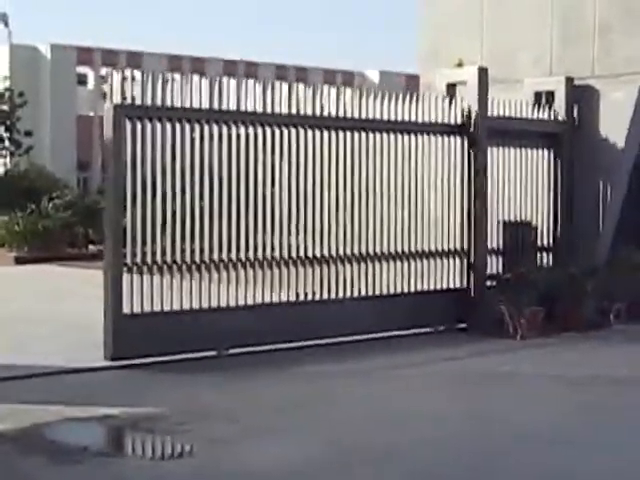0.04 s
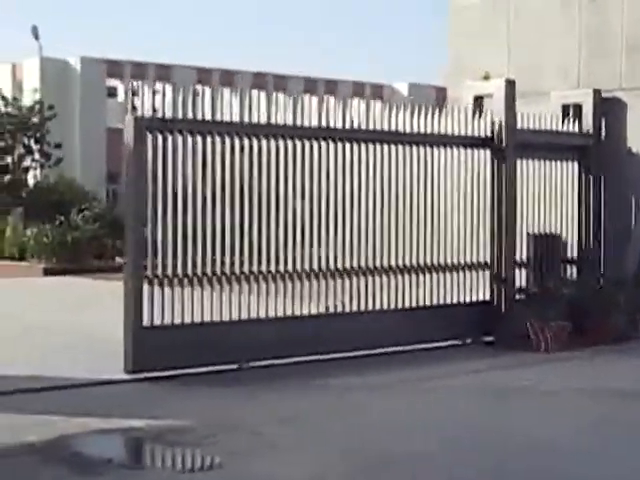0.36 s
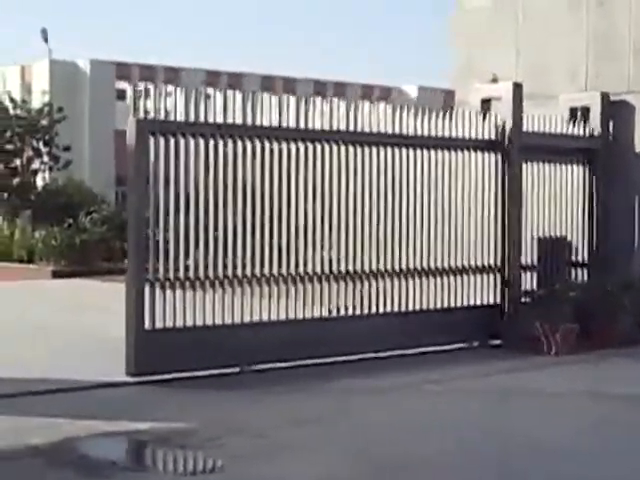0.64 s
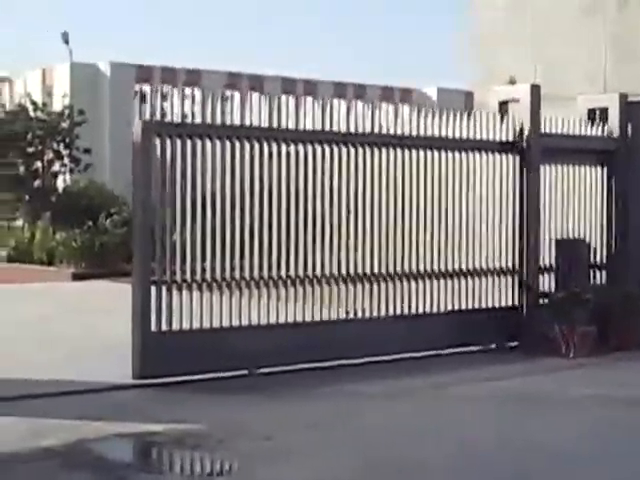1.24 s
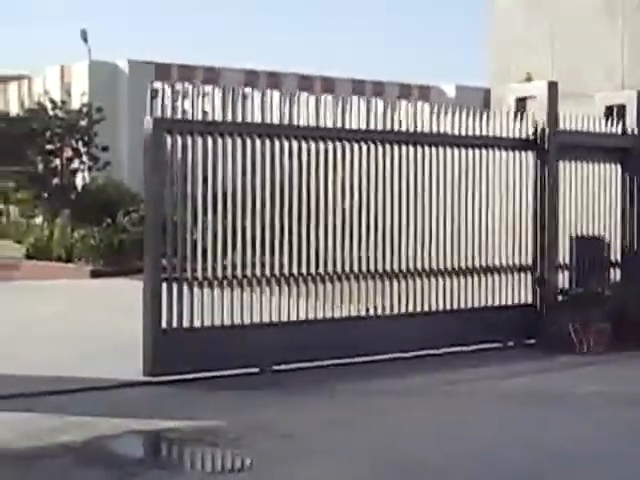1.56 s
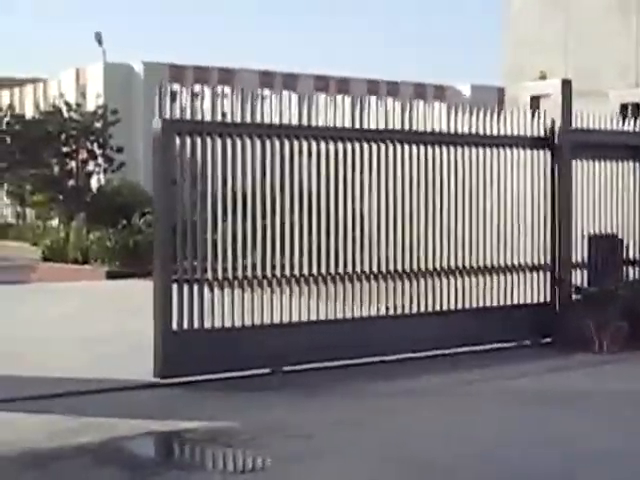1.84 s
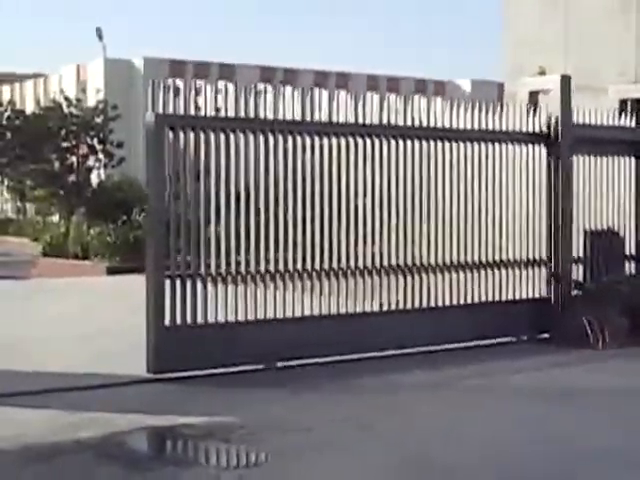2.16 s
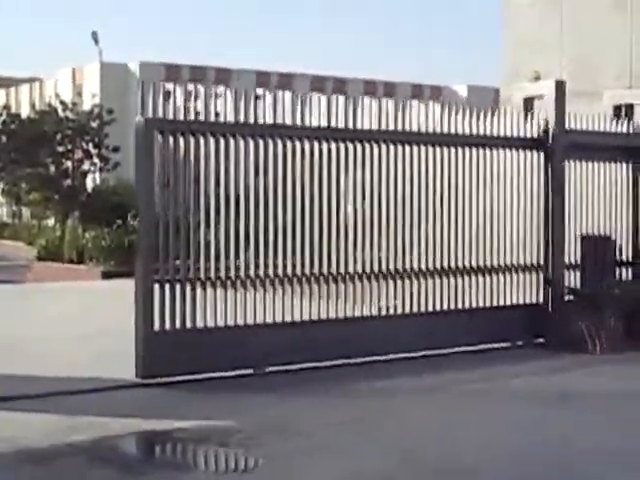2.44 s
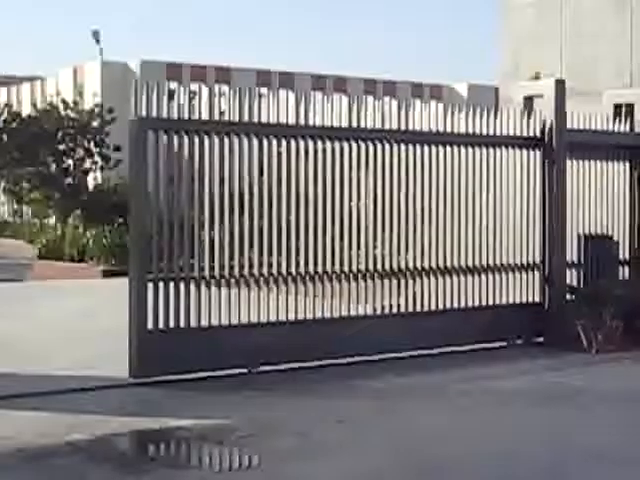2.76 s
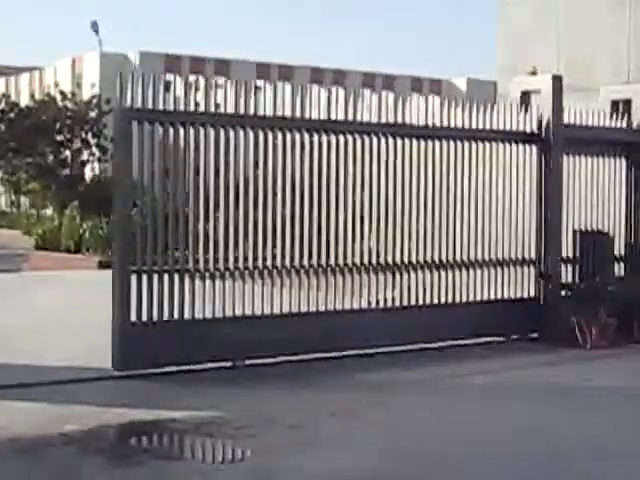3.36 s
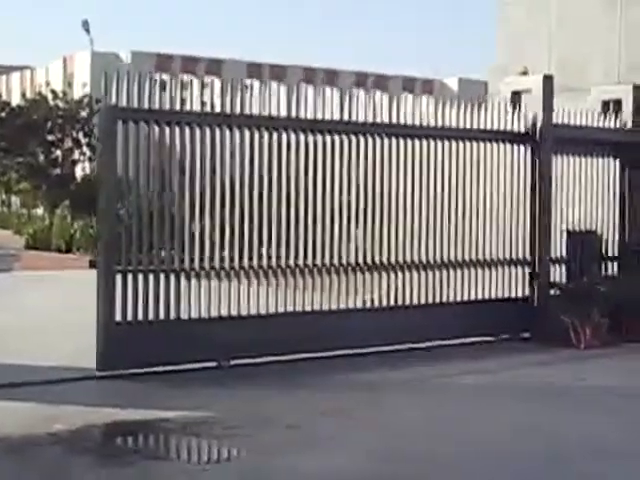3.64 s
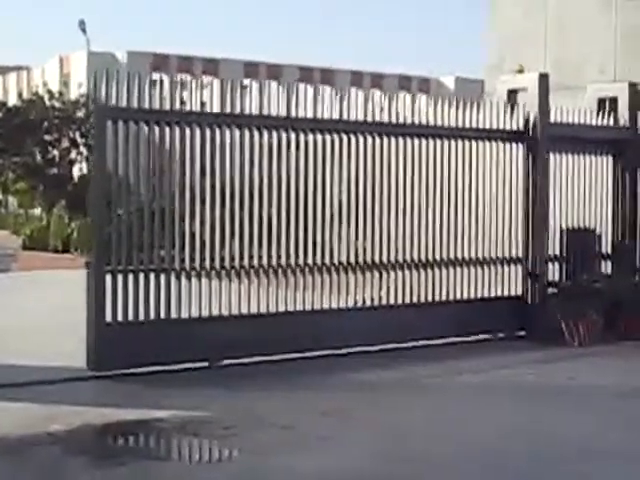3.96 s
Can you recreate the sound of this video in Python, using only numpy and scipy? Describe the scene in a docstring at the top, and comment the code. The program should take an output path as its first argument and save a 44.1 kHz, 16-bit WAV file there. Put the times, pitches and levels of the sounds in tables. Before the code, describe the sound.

A heavy steel gate rolls along its track, rumbling and rattling over a motor hum.

```python
"""A heavy steel sliding gate rolls along its track across a driveway. Its wheels rumble, scrape and hiss
on the rail, and the frame booms at uneven spots. A low drone, the motor and a few tones of the frame
waver underneath, mostly drifting upward. The drive's teeth rattle the rack about eight times a second,
louder toward the end, among sharper steel ticks. A small microphone with a dull top hears it."""
import sys
import numpy as np
from scipy import signal
from scipy.fft import rfft, irfft, next_fast_len
from scipy.io import wavfile
from scipy.ndimage import uniform_filter1d, map_coordinates

SR = 44100
rng = np.random.default_rng(int(sys.argv[2]) if len(sys.argv) > 2 else 0)


def unload_wav(signal):
    """Save mono or channel-first audio to the path in sys.argv[1] as 16-bit WAV at rate SR, clipped to [-1, 1]."""
    wavfile.write(
        sys.argv[1],
        SR,
        np.round(np.clip(np.atleast_2d(signal).T, -1, 1) * 32767).astype(np.int16),
    )


N = 176400

# Fader rides of the wheels' rumble, rolling noise and scrape, ahead of any trim (t/s, level/dB)
RUMBLE_FADER = [(0, -23.5), (.5, -27.5), (1.3, -25), (2, -25.5), (2.4, -27), (3, -24.5), (3.6, -28),
                (4, -28.5)]
ROLL_FADER = [(0, -32.5), (.6, -31.5), (1.1, -33.5), (1.4, -34.5), (2.0, -34), (2.3, -32), (2.62, -30),
              (3.1, -32.5), (3.45, -31.5), (3.82, -33.5), (4, -30.5)]
SCRAPE_FADER = [(0, -38), (.22, -31), (.38, -33.5), (.55, -34), (.85, -38), (1.08, -35), (1.4, -41.5),
                (2.2, -57.5), (4, -56.5)]
# Spectra of the wheels on the rail, from dark to bright (f/Hz, level/dB)
RUMBLE_EQ = [(20, -14.5), (40, -22), (52, -5.5), (76, -1.5), (100, 2.5), (140, -1.5), (200, -5.5),
             (250, -5.5), (310, -6), (385, -5.5), (470, -16), (700, -27.5), (1500, -69.5)]
ROLL_EQ = [(200, -18.5), (450, 0), (590, -0.5), (690, -1.5), (920, -2), (1030, 0), (1330, -5), (1480, -4),
           (1750, -9), (2100, -9.5), (2700, -15.5), (4000, -23), (6000, -36)]
SCRAPE_EQ = [(700, -23), (1030, 2.5), (1150, -3), (1260, 2.5), (1360, -4), (1500, 2.5), (1720, -3.5),
             (1970, 1.5), (2300, -6), (2580, -3.5), (2850, -9), (3150, -6.5), (3350, -10.5), (3600, -9),
             (4500, -21.5), (6500, -40)]
HISS_EQ = [(1200, -15), (2500, -0.5), (3600, 2), (4100, 1.5), (4650, -1), (5200, -4), (6000, -12),
           (7000, -24)]
# The low drone, and the deeper one that takes over halfway (t/s, f/Hz, level/dB)
LOW_DRONE = [(0, 59.5, -25.5), (.27, 60.64, -32), (.6, 60.95, -22.5), (1.1, 62.36, -26.5),
             (1.5, 62.7, -24.5), (1.85, 64.2, -27), (2.15, 64.8, -31.5), (2.4, 65.5, -43), (4, 63.7, -54.5)]
DEEP_DRONE = [(0, 50.17, -52), (1.7, 50, -47.5), (2.2, 50.16, -32.5), (2.7, 51.2, -36), (3.3, 51, -32.5),
              (3.6, 52.9, -36), (4, 53.7, -37)]
# The motor's hum (t/s, f/Hz, level/dB)
MOTOR_HUM = [(0, 224, -35.5), (.72, 222, -35), (.85, 231, -31.5), (1.35, 236.3, -29), (1.6, 239.2, -32),
             (2.05, 244.1, -31), (2.401, 246, -37), (2.65, 246, -30), (3.099, 241, -37.5),
             (4, 227.5, -38.5)]
# Tones of the frame, from low to high (t/s, f/Hz, level/dB)
FRAME_LOW = [(0, 112.4, -42), (.5, 112, -31), (.9, 115.9, -42.5), (2.2, 120.4, -38.5), (2.5, 117.8, -27.5),
             (2.9, 115, -41.5), (3.4, 115.9, -38), (3.7, 113.4, -33.5), (4, 118.5, -36)]
FRAME_LOW_MID = [(0, 152, -43.5), (0.998, 154.3, -33), (2, 156.5, -36), (2.548, 161.4, -33.5),
                 (3.2, 167, -38), (3.498, 176.6, -31.5), (3.72, 175.4, -27.5), (3.85, 173.7, -42),
                 (4, 176, -49)]
FRAME_MID = [(0, 190.3, -47.5), (1.099, 189.5, -44.5), (1.55, 193.9, -34.5), (1.95, 188, -51),
             (2.22, 195.2, -25.5), (2.42, 189.5, -46), (4, 189.6, -53)]
FRAME_UPPER = [(0, 319.2, -39.5), (.5, 313.7, -38), (1.001, 297.2, -42.5), (2.3, 295.4, -49),
               (2.7, 303.8, -36.5), (3.001, 307.6, -37.5), (3.3, 313, -39), (4, 316.5, -42.5)]
FRAME_TOP = [(0, 321.5, -45.5), (1.6, 313.5, -44.5), (1.9, 315.8, -35.5), (2.2, 328, -40.5),
             (2.65, 334.7, -32), (3.1, 343.9, -29.5), (3.32, 345, -35), (3.44, 346, -28.5),
             (3.57, 347, -27), (3.75, 351.8, -32.5), (4, 355.3, -27.5)]
# Bright and lower resonances of the rack (f/Hz, width/Hz, level/dB)
RACK_BRIGHT_MODES = [(4575, 670, 1.5), (4860, 770, 0), (5530, 310, -13.5), (6170, 760, -4)]
RACK_LOW_MODES = [(2142, 220, 2.5), (2282, 220, 1)]
# Fader rides of the rack's bright and lower ring (t/s, level/dB)
RACK_BRIGHT_FADER = [(0, -57.5), (.25, -55), (.8, -62), (1.4, -54.5), (2, -52.5), (2.35, -47.5),
                     (2.75, -46.5), (3.1, -51), (3.52, -44.5), (3.85, -48), (4, -42)]
RACK_LOW_FADER = [(0, -62), (1.9, -48.5), (2.4, -42.5), (2.8, -41.5), (3.2, -42.5), (3.55, -38), (4, -42)]
# Steel-on-steel ticks (t/s, level/dB, decay/s)
TICK_HITS = [(.130, -34, .006), (.307, -36, 0.01), (.321, -27.5, 0.0046), (.505, -36, 0.0055),
             (0.686, -43, 0.018), (1.565, -38.5, 0.024), (1.710, -34, 0.0069), (2.068, -34, 0.015),
             (2.313, -35.5, 0.011), (2.545, -38.5, 0.018), (2.72, -38, 0.014), (3.036, -40, .012),
             (3.408, -34, 0.0079), (3.463, -32.5, 0.0084), (3.52, -34, 0.01), (3.613, -34, .012),
             (3.733, -33.5, 0.01), (3.925, -35.5, .009), (3.960, -36.5, 0.02)]
# Spectrum of a tick (f/Hz, level/dB)
TICK_EQ = [(1500, -22), (3000, -3), (4200, -1.5), (4650, 9.5), (5100, -2.5), (6100, -5.5), (7000, -11)]
# Crests of the frame's booms at uneven spots (t/s, level/dB)
BOOM_CRESTS = [(.35, -27.5), (.52, -29.5), (1.63, -26), (1.9, -24.5), (2.419, -24.5), (2.521, -27),
               (2.63, -21), (2.8, -24.5), (2.94, -23.5), (3.07, -22), (3.55, -23.5), (3.701, -24.5)]
# Spectrum of a boom (f/Hz, level/dB)
BOOM_EQ = [(50, -23), (85, -4.5), (110, 2.5), (145, 1.5), (190, -4.5), (260, -9.5), (330, -7), (600, -46.5)]
# Response of the small microphone (f/Hz, level/dB)
MIC_EQ = [(20, 1), (5800, 0), (6300, -6.5), (6600, -15), (6850, -15.5), (7100, -36), (7400, -68.5)]

RUMBLE_TRIM_DB, ROLL_TRIM_DB, HISS_DB = -0.5, 1.5, -45
THROB_PERIOD_S, THROB_CREST_S, THROB_DEPTH_DB = 0.126, 3.575, 5
TOOTH_START_S, TOOTH_PERIOD_S, TOOTH_JITTER_S = 0.035, 0.119, 0.0034
TOOTH_ATTACK_S, TOOTH_DECAY_S = 0.0082, 0.043
TICK_ATTACK_S, BOOM_WIDTH_S = 0.00069, 0.043
FAINT_HISS_DB, HIGH_CUT_HZ = -76, 15700
TIME = np.arange(N) / SR


def amp(db):
    """Decibels to gain."""
    return 10 ** (np.asarray(db) / 20)


def unit(x):
    """Scale to rms 1."""
    return x / np.sqrt(np.mean(x ** 2) + 1e-20)


def curves(rows):
    """Breakpoints to automation: one curve for each column after the time."""
    times, *columns = np.transpose(rows)
    return [np.interp(TIME, times, column) for column in columns]


def wobble(rate):
    """A smooth random curve, rate knots a second."""
    return map_coordinates(rng.standard_normal(4096), [TIME * rate + 2], mode="wrap")


def strike(start, attack, decay):
    """Envelope of one hit: exponential rise and decay, times in seconds."""
    age = np.maximum(TIME - start, 0)
    return (1 - np.exp(-age / attack)) * np.exp(-age / decay)


def filtered(x, response):
    """Filter x by a gain given as a function of frequency."""
    size = next_fast_len(N + SR // 2)
    return irfft(rfft(x, size) * response(np.fft.rfftfreq(size, 1 / SR)), size)[:N]


def equalised(x, eq):
    """Shape x with an EQ curve drawn on a log frequency axis."""
    freqs, db = np.transpose(eq)
    return filtered(x, lambda hz: amp(np.interp(np.log(hz + 1), np.log(freqs + 1), db)))


def noise_bed(eq, patchy_db):
    """Shaped noise of rms 1 that swells and fades in patches of time and frequency."""
    spectrum = signal.stft(rng.standard_normal(N), nperseg=2048)[2]
    patches = uniform_filter1d(rng.standard_normal(spectrum.shape), 3, axis=0)
    patches = unit(uniform_filter1d(patches, 12, axis=1))
    noise = signal.istft(spectrum * amp(patchy_db * patches))[1][:N]
    return unit(equalised(noise, eq))


def tone(rows, drift_hz, flutter_db, rough):
    """A wavering sine on a pitch and level curve, with a fuzzy skirt."""
    hz, db = curves(rows)
    phase = 2 * np.pi * np.cumsum(hz + drift_hz * wobble(12)) / SR
    skirt = wobble(45) * np.sin(phase) + wobble(45) * np.cos(phase)
    wave = np.sin(phase) + rough * skirt
    return amp(db) * unit(wave * amp(flutter_db * wobble(16)))


def wheels():
    """Wheels on the rail: a low rumble, a midrange roll, an early scrape of rubbing and a fine hiss."""
    rumble = amp(curves(RUMBLE_FADER)[0] + RUMBLE_TRIM_DB + 0.5 * wobble(17))
    rumble *= noise_bed(RUMBLE_EQ, patchy_db=2.3)
    roll = amp(curves(ROLL_FADER)[0] + ROLL_TRIM_DB + 0.27 * wobble(35))
    roll *= noise_bed(ROLL_EQ, patchy_db=1.57)
    scrape = amp(curves(SCRAPE_FADER)[0] + wobble(30)) * noise_bed(SCRAPE_EQ, patchy_db=3)
    hiss = amp(HISS_DB + 1.5 * wobble(40)) * noise_bed(HISS_EQ, patchy_db=1.5)
    return rumble + roll + scrape + hiss


def drone():
    """The bottom end: a low tone creeps upward and hands over to a deeper one."""
    low = tone(LOW_DRONE, drift_hz=0.75, flutter_db=0.35, rough=0.06)
    deep = tone(DEEP_DRONE, drift_hz=0.85, flutter_db=1, rough=0.15)
    return low + deep


def motor():
    """The motor hums, climbing a little in pitch and sagging near the end."""
    return tone(MOTOR_HUM, drift_hz=0.8, flutter_db=1.5, rough=0.19)


def frame_tones():
    """The steel frame sings in five tones; the highest throbs about eight times a second."""
    body = sum(tone(rows, drift_hz=2.18, flutter_db=2, rough=0.25)
               for rows in (FRAME_LOW, FRAME_LOW_MID, FRAME_MID, FRAME_UPPER))
    top = tone(FRAME_TOP, drift_hz=1.49, flutter_db=1, rough=0.12)
    throb_db = THROB_DEPTH_DB * np.cos(2 * np.pi * (TIME - THROB_CREST_S) / THROB_PERIOD_S)
    return body + unit(amp(throb_db)) * top


def tooth_force():
    """The force of the drive, rms 1: a steady push plus a kick as each tooth meshes."""
    starts = TOOTH_START_S + TOOTH_PERIOD_S * np.arange(34) + TOOTH_JITTER_S * rng.standard_normal(34)
    kicks = sum(strike(start, TOOTH_ATTACK_S, TOOTH_DECAY_S) for start in starts)
    return unit(0.32 + kicks)


def rack_ring(modes, rate, spread_db):
    """Tiny random contacts, rate a second, ring the rack's resonances."""
    def response(hz):
        """Two band-passes in series for each mode, the modes summed."""
        return sum(amp(db) * (1j * hz * width / (centre ** 2 - hz ** 2 + 1j * hz * width)) ** 2
                   for centre, width, db in modes)

    contacts = (rng.random(N) < rate / SR) * rng.choice([-1, 1], N)
    strength = amp(spread_db * rng.standard_normal(N))
    return unit(filtered(contacts * strength, response))


def drive_rattle():
    """Each tooth swells the jingle of tiny contacts on the rack."""
    force = tooth_force()
    held_force = unit(0.35 + force)  # the lower ring sustains more between teeth
    bright = amp(curves(RACK_BRIGHT_FADER)[0]) * rack_ring(RACK_BRIGHT_MODES, rate=1200, spread_db=5.5)
    low = amp(curves(RACK_LOW_FADER)[0]) * rack_ring(RACK_LOW_MODES, rate=1000, spread_db=4.5)
    return force * bright + held_force * low


def steel_ticks():
    """Steel chinks on steel: short, bright bursts of noise with a hard attack."""
    envelope = sum(amp(db) * strike(start, TICK_ATTACK_S, decay) for start, db, decay in TICK_HITS)
    return envelope * noise_bed(TICK_EQ, patchy_db=0)


def frame_booms():
    """The frame swells into a short, soft-edged boom as the wheels pass each uneven spot."""
    envelope = sum(amp(db) * np.exp(-((TIME - crest) / BOOM_WIDTH_S) ** 2) for crest, db in BOOM_CRESTS)
    return envelope * noise_bed(BOOM_EQ, patchy_db=2.5)


def scene():
    """The rolling gate, mixed in mono."""
    bed = wheels() + drone() + motor() + frame_tones()
    return (bed + drive_rattle() + steel_ticks() + frame_booms())[None]


def record(dry):
    """The microphone rolls off steeply in the treble. A very faint, even hiss lies under everything."""
    heard = equalised(dry[0], MIC_EQ) + amp(FAINT_HISS_DB) * rng.standard_normal(N)
    return filtered(heard, lambda hz: hz < HIGH_CUT_HZ)[None]


dry = scene()
out = record(dry)
unload_wav(out)
```